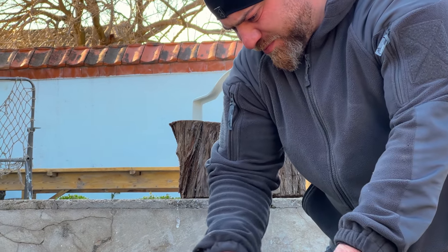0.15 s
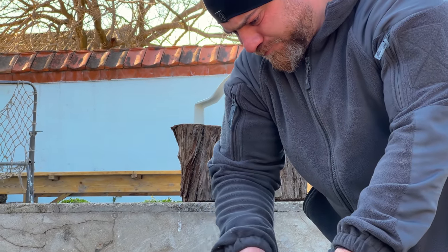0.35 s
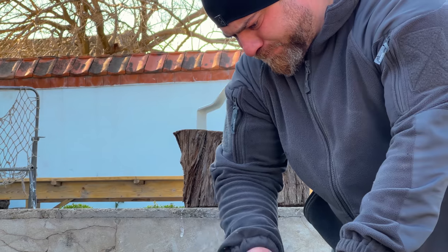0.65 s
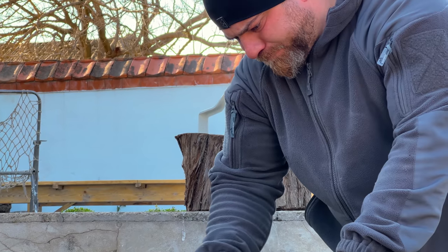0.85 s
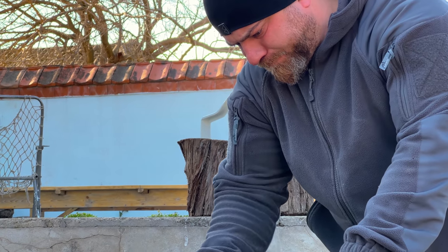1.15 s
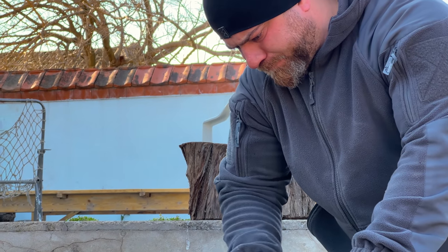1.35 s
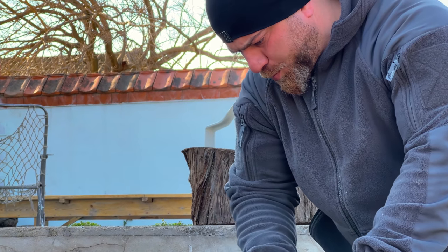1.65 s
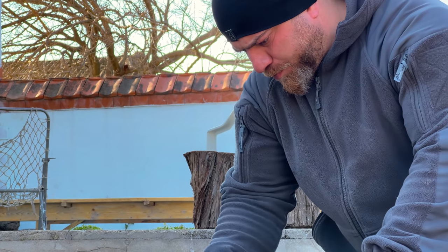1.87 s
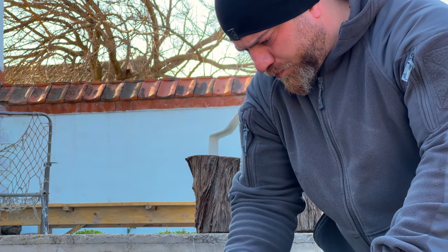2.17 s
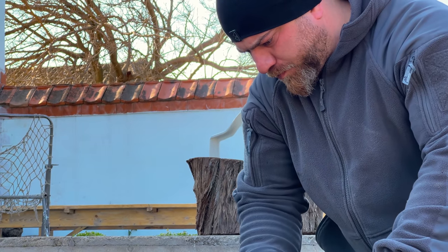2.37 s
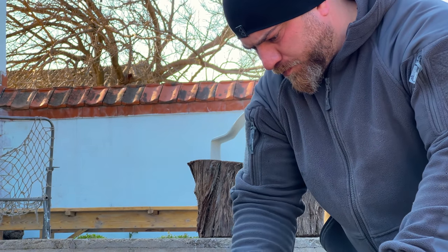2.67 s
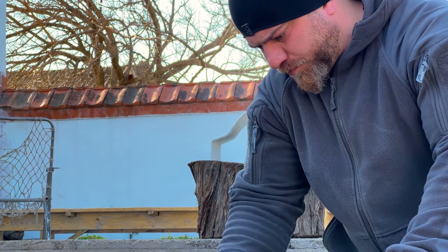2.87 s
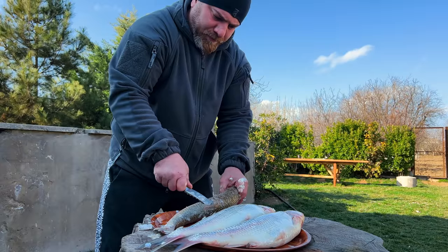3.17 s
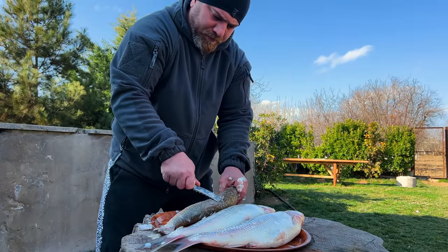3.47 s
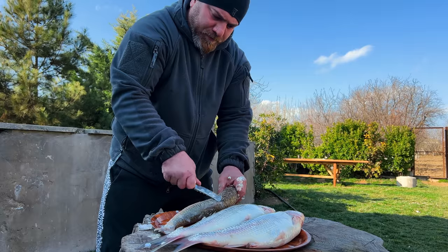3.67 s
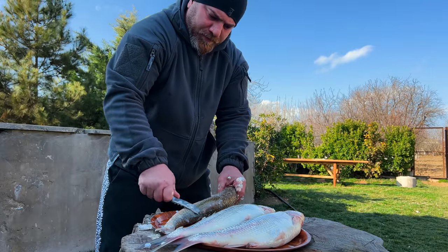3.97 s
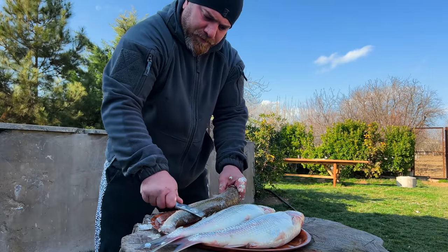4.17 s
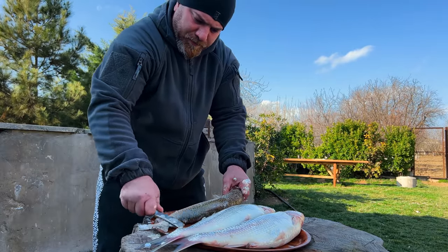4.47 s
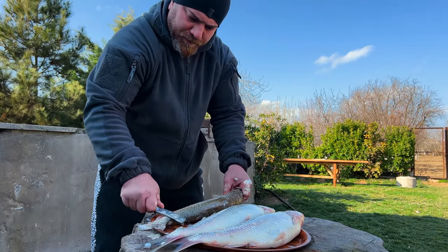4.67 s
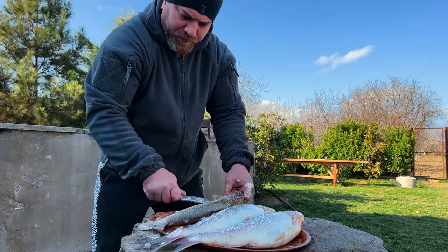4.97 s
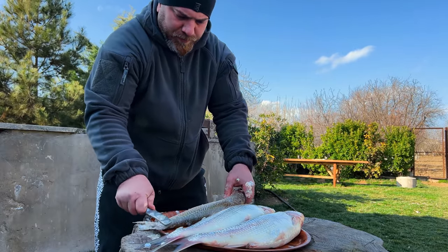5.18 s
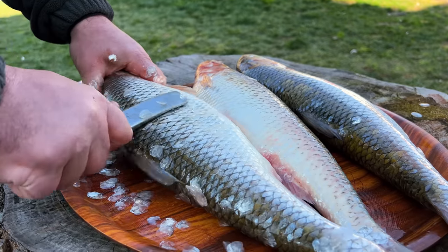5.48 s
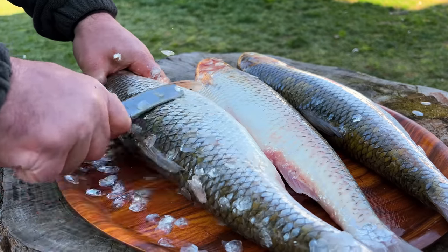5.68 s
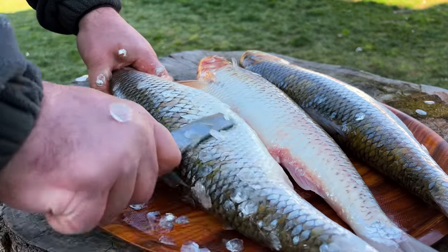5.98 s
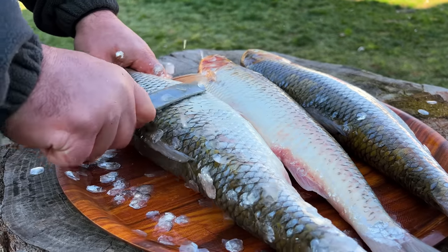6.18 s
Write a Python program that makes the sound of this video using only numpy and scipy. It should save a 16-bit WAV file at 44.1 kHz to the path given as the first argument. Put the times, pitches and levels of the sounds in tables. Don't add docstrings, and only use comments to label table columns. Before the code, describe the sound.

Crisp, rhythmic fish scaling with a metal blade over a wooden tray in a quiet garden, suddenly louder and closer near the end.

```python
import sys
import numpy as np
from scipy import signal
from scipy.fft import rfft, irfft
from scipy.io import wavfile
from scipy.ndimage import uniform_filter1d

SR = 44100
rng = np.random.default_rng(int(sys.argv[2]) if len(sys.argv) > 2 else 0)


def invert_db(x):
    u = np.asarray(x, float) / 20
    return 10 ** u


def master(y):
    cut = np.clip(np.atleast_2d(y).T, -1, 1)
    pcm = np.round(cut * 32767)
    wavfile.write(sys.argv[1], SR, pcm.astype(np.int16))


N = 279153
T, HZ = np.arange(N) / SR, np.arange(N // 2 + 1) * SR / N


def over_hz(rows, axis=1):
    rows = np.array(rows, float)
    return np.interp(np.log(HZ + 1), np.log(rows[:, 0]), rows[:, axis])


def over_time(gestures):
    power = np.zeros(N)
    for corners in gestures:
        s, db = np.transpose(corners)
        s = np.r_[s[0] - 0.006, s, s[-1] + 0.012]
        db = np.r_[db[0] - 18, db, db[-1] - 18]
        span = slice(max(int(s[0] * SR), 0), int(s[-1] * SR))
        power[span] += invert_db(np.interp(T[span], s, db)) ** 2
    return np.sqrt(power)


def unit(x):
    return x / np.sqrt(np.mean(x ** 2))


def walk(rate):
    k = int(SR / rate)
    steps = np.repeat(rng.standard_normal(N // k + 1), k)
    return 0.76 * uniform_filter1d(uniform_filter1d(steps, k), k)[:N]


def spikes(s, size):
    x = np.zeros(N)
    np.add.at(x, np.clip((np.asarray(s) * SR).astype(int), 0, N - 1), size)
    return x


def smear(x, decay_s):
    tail = np.exp(-T[:400] / decay_s)
    power = signal.fftconvolve(x ** 2, tail / tail.sum())[:N]
    return np.sqrt(abs(power)) * rng.standard_normal((2, N))


def patches(x, depth_db, rate):
    _, _, z = signal.stft(x, nperseg=256)
    field = rng.standard_normal((20, z.shape[-1]))
    field = unit(uniform_filter1d(field, size=int(SR / 128 / rate)))
    half_octave = (2 * np.log2(np.arange(z.shape[-2]) + 1)).astype(int)
    _, y = signal.istft(z * invert_db(depth_db * field[half_octave]), nperseg=256)
    return unit(y[..., :N])


def pair_noise(colour, apart, x):
    mid, side = rfft(x) * invert_db(over_hz(colour))
    scale = np.sqrt(np.mean(irfft(mid, N) ** 2))
    return irfft(mid + apart * side * np.array([[1], [-1]]), N) / scale


# f/Hz, level/dB per Hz
GARDEN_COLOUR = [(35, 1), (72, 12.5), (110, -37), (220, 3), (600, -7), (1500, -14.5), (4000, -18.5),
                 (8800, -24.5), (10100, -48), (11300, -20.5), (13000, -19), (16000, -35)]


def garden():
    drift = invert_db(1.1 * walk(2.65) + 2.6 * walk(5.39))
    air = patches(rng.standard_normal((2, N)), depth_db=3.5, rate=9.8) * drift
    shelter = invert_db(np.interp(T, [2.35, 2.5, 2.65, 2.8, 4.9, 5.05], [2.5, 0.5, 0.0, -2, 2.0, 7]))
    return invert_db(-76) * shelter * pair_noise(GARDEN_COLOUR, 0.95, air)


# middle t/s, half length/s, level/dB
GUSTS = [(0.115, 0.13, -51), (0.526, 0.031, -67), (0.814, 0.041, -66.5), (1.466, 0.042, -59),
         (1.577, 0.12, -58), (1.824, 0.032, -61), (1.997, .1, -67), (2.146, 0.032, -50.5),
         (2.246, 0.046, -53), (2.537, 0.057, -62.5), (2.684, 0.045, -72), (3.088, 0.55, -66.5),
         (3.46, 0.032, -72), (4.003, 0.25, -73), (4.54, 0.087, -64), (5.15, 0.044, -55.5),
         (5.247, 0.093, -53), (5.36, 0.022, -69), (5.494, 0.067, -52.5), (5.61, 0.095, -51),
         (5.817, 0.081, -49.5), (5.986, 0.057, -56), (6.117, 0.051, -45.5), (6.26, 0.069, -55.5)]
# t/s, peak level/dB
BUMPS = [(0.225, -49), (1.414, -52.5), (1.528, -49), (1.809, -58), (2.135, -47), (2.233, -45), (2.337, -54),
         (2.53, -53), (4.921, -77), (5.103, -71), (5.254, -42), (5.345, -51), (5.603, -47), (5.78, -42),
         (6.11, -49), (6.242, -47.5)]
# f/Hz, level/dB
WIND_COLOUR = [(30, -2), (75, 3), (100, 8), (125, 3.5), (200, -5), (400, -18), (700, -48), (1200, -50)]


def wind():
    calm_db, fall_db = -75.5, 11.5
    gust = invert_db(calm_db) + sum(invert_db(db - fall_db * abs(T - s) / half) for s, half, db in GUSTS)
    eddies = rng.standard_normal((2, N)) * invert_db(3.8 * walk(30))
    rumble = invert_db(-1.0) * gust * pair_noise(WIND_COLOUR, 0.5, eddies)
    t = T[:4000]
    glide = 0.59 * (1 - np.exp(-t / 0.006))
    ring = np.sin(2 * np.pi * (112 * t + glide)) * np.exp(-t / 0.015)
    s, db = np.transpose(BUMPS)
    bumps = signal.fftconvolve(spikes(s, invert_db(db)), ring)[:N]
    return rumble + bumps * invert_db([[0.6], [-0.6]])


def tone(call, orders, waver):
    s, length, from_hz, to_hz, db = call
    if to_hz > from_hz:
        ease, loudest, swell_db, fade_db = 1.6, 0.85, 6, 3
    else:
        ease, loudest, swell_db, fade_db = 4.5, 0.45, 9, 11
    done = (1 - np.exp(-ease * np.clip((T - s) / length, 0, 1))) / (1 - np.exp(-ease))
    phase = 2 * np.pi * np.cumsum((from_hz + (to_hz - from_hz) * done) * waver) / SR
    wave = sum(invert_db(order_db) * np.sin(k * phase) for k, order_db in orders)
    if abs(to_hz - from_hz) < 50:
        wave = wave * invert_db(-11 * np.sin(np.pi * 29 * (T - s)) ** 2)
    swell = [(s, db - swell_db), (s + loudest * length, db), (s + length, db - fade_db)]
    return np.sqrt(2) * wave * over_time([swell])


# t/s, length/s, from f/Hz, to f/Hz, peak level/dB
BIRDS = [(.75, .2, 2480, 3250, -82), (.79, .075, 6080, 6220, -79), (.872, .02, 6000, 5940, -81),
         (.9, .045, 6600, 6780, -72), (1.065, .09, 3800, 3170, -69), (1.15, .11, 3200, 3175, -76),
         (1.195, .05, 6650, 6800, -74), (1.34, .08, 3300, 3240, -80), (1.435, .06, 4010, 3985, -73),
         (1.493, .125, 3980, 3995, -67), (1.62, .06, 3970, 3950, -78), (1.96, .03, 3950, 4200, -82),
         (2.05, .2, 3730, 3710, -76), (3.68, .25, 2330, 3430, -77), (3.93, .016, 3400, 3230, -79),
         (3.955, .04, 3410, 3380, -84), (4.12, .045, 3450, 3150, -87), (4.43, .09, 5450, 5230, -84)]
# t/s, length/s, from f/Hz, to f/Hz, peak level/dB
FOWL = (2.17, .11, 405, 407, -79)
# multiple of the pitch, level/dB
FOWL_ORDERS = [(2, 7), (3, 3), (4, -5), (5, -7)]


def birds():
    waver = 1 + 0.005 * walk(120)
    song = sum(tone(call, [(1, 0)], waver) for call in BIRDS)
    song = song * invert_db(2.5 * walk(60) - 1.5)
    fowl = tone(FOWL, FOWL_ORDERS, waver) * invert_db(1.9 * walk(63))
    return np.array([song, np.roll(song, 1)]) + fowl


def ticks(rows, ring_s, crack, rise_s, rough):
    out, t = np.zeros(N), T[:4000]
    shape = np.exp(-t / ring_s) * (1 - np.exp(-t / rise_s))
    for s, db, hz in rows:
        dry_crack = crack * uniform_filter1d(rng.standard_normal(4000), size=6)
        wobble = rough * np.cumsum(rng.standard_normal(4000)) / 10
        ring = np.sin(2 * np.pi * hz * t + wobble)
        out[int(s * SR):int(s * SR) + 4000] += invert_db(db) * (ring + dry_crack) * shape
    return out


# t/s, peak level/dB, f/Hz
DROPS = [(1.32, -47, 950), (1.3275, -53, 833), (1.338, -43.5, 976), (1.355, -47, 1000), (5.06, -53, 1680),
         (5.093, -55, 1590), (5.105, -48, 1760), (5.121, -50, 1540), (5.135, -63, 1720), (5.146, -47, 1875),
         (2.027, -61.5, 1330), (2.067, -57.5, 1450), (2.2948, -52, 1145), (2.3194, -51.5, 1540),
         (2.378, -55, 1660), (2.4107, -58.5, 1295)]
# t/s, peak level/dB, f/Hz
KNOCKS = [(2.3, -60, 519), (2.416, -58.5, 427), (2.875, -64, 564), (2.734, -54, 436), (3.039, -59.5, 407),
          (4.178, -58.5, 419), (4.205, -55, 365.5), (4.246, -64, 352), (4.55, -53, 418),
          (4.885, -56.5, 415), (4.92, -56, 340), (5.165, -52, 414)]


def wood():
    scales = ticks(DROPS, ring_s=0.0056, crack=1.26, rise_s=0.0002, rough=2.2)
    return scales + ticks(KNOCKS, ring_s=0.031, crack=0.58, rise_s=0.0051, rough=0.71)


# f/Hz, width/Hz, level/dB
TRAY = [(740, 70, 6), (1000, 80, 8)]


def tray_ring():
    return 1 + sum(invert_db(db) / (1 + 2j * (HZ - hz) / width) for hz, width, db in TRAY)


# f/Hz, level/dB
BESIDE = [(370, -11.5), (990, -8.5), (2450, -10.5), (4200, 7.5), (5400, 3), (6500, 8.5), (7900, 1.5),
          (9200, 3.5), (10300, -7.5), (12000, 4.5), (15500, 1)]
FRONT = [(394, -4.5), (860, -10), (2800, -11.5), (4800, 4), (5600, 6.5), (7200, 2), (8500, 10), (10000, 5),
         (11870, 7), (16000, 12)]
CLOSE = [(484, -6), (1380, -10), (2500, -7), (3500, 8), (4800, 11), (6200, 8.5), (7800, 4), (8420, 11.5),
         (10090, 6.5), (11940, 12), (15800, 13)]
# from t/s, colour; from the second entry on a hand damps the tray
PLACES = [
    (0.0, BESIDE),
    (1.9, BESIDE),
    (3.1, FRONT),
    (5.009, CLOSE),
]
# f/Hz, left lead/rad, likeness 0-1; the phone's case alone sets the top range
CASE = [(9600, -3.05, .8), (10200, -3.15, .93), (12000, -5, .94), (14000, -6.65, .94), (15500, -8.2, .87)]
BESIDE_PORTS = [(400, 0, .8), (1500, 0, .97), (3000, .25, .93), (4000, .55, .85), (5400, .1, .9),
                (6000, -.5, .85), (6700, 0, .93), (7800, -.6, .85)]
FRONT_PORTS = [(400, .2, .7), (900, 2, .2), (2000, .7, .6), (3800, 2.9, .75), (4800, 1.8, .4),
               (6000, 2.2, .15), (7000, .8, .4), (8400, -3.2, .25)]
CLOSE_PORTS = [(400, .4, .5), (1500, .6, .65), (3500, 2.85, .92), (4500, 3.14, .75), (5400, 3.2, .45),
               (6000, 2, .15), (7200, 0, .2), (8400, -1.9, .65)]


def phone_paths():
    paths = []
    pairs = [BESIDE_PORTS, BESIDE_PORTS, FRONT_PORTS, CLOSE_PORTS]
    for (_, place), pair in zip(PLACES, pairs):
        like = over_hz(pair + CASE, axis=2)
        lead = np.exp(0.5j * over_hz(pair + CASE) * np.array([[1], [-1]]))
        colour = invert_db(over_hz(place))
        paths.append((colour * np.sqrt(like) * lead, colour * np.sqrt(1 - like)))
    paths[0] = [path * tray_ring() for path in paths[0]]
    return paths


def strokes(rows, rise_db, hold, sag_db, lift_db, bite_at, before_db, after_db, answer, skim_db):
    edge = over_time([[(s, db - rise_db),
                       (s + at * length, db),
                       (s + (at + hold * (1 - at)) * length, db - sag_db),
                       (s + length, db - lift_db)] for s, length, db, at, _ in rows])
    gains = [edge]
    for (per_db, over_db), skim in zip(answer, skim_db):
        bites = []
        for s, length, db, _, deep in rows:
            top = db + per_db * deep + over_db
            bites.append([(s, top - before_db), (s + bite_at * length, top), (s + length, top - after_db)])
        gains.append(np.hypot(invert_db(skim) * edge, over_time(bites)))
    return np.array(gains)


# t/s, length/s, edge peak level/dB, peak place as share of length, bite/dB
STROKES = [(0.05, 0.099, -49, 0.41, -3), (0.34, 0.12, -49.5, 0.44, -2), (0.64, 0.092, -47, 0.5, 1),
           (0.92, 0.13, -50, 0.47, 3), (1.25, .13, -49, 0.53, 1), (1.595, 0.21, -55.5, 0.047, -31),
           (1.64, 0.11, -50.5, 0.47, 4.5), (1.98, 0.086, -51.5, 0.58, -13), (2.33, 0.1, -50, 0.43, -13),
           (2.655, 0.098, -51, 0.71, -6), (2.965, 0.11, -50, 0.4, -9), (3.2, 0.082, -48, 0.51, -23.5),
           (3.352, 0.059, -58, .2, -36), (3.42, 0.093, -45, 0.36, -28), (3.553, 0.062, -54.5, 0.6, -35),
           (3.76, 0.092, -61.5, 0.077, -33), (3.63, 0.079, -45, 0.45, -27.5),
           (3.84, 0.098, -51.5, 0.39, -23), (4.16, 0.15, -52.5, 0.24, -16), (4.52, 0.09, -49.5, 0.74, -10),
           (4.83, 0.11, -54, 0.82, -10)]
CLOSE_STROKES = [(5.03, 0.15, -43, 0.4, -4.5), (5.325, 0.047, -42, 0.2, -56), (5.385, 0.13, -32, 0.042, -6),
                 (5.535, 0.08, -35.5, 0.23, -14), (5.632, 0.11, -33, 0.11, -5.5),
                 (5.765, 0.098, -33.5, 0.22, -19), (5.872, .12, -31.5, .08, -5),
                 (6.012, 0.096, -36, 0.17, -10.5), (6.125, 0.14, -30.5, 0.12, -5.5),
                 (6.275, 0.07, -45.5, 0.26, -3.5)]
# the edge rises, sags while the blade holds, then lifts; late on the blade bites, and
# scales and flesh answer by (dB per dB of bite, dB over edge peak); until then they skim along under the edge
FAR_STROKE = dict(rise_db=17.5, hold=0.37, sag_db=12.5, lift_db=23, bite_at=0.67, before_db=32, after_db=17.5, answer=[(.4, -8.5),
              (1.01, -4.6)], skim_db=[-14, -33])
CLOSE_STROKE = dict(rise_db=21.5, hold=0.85, sag_db=9.5, lift_db=36, bite_at=0.63, before_db=11.5, after_db=17.5, answer=[(1.55, -2),
                (0.14, -20.5)], skim_db=[-17, -25])


def blade_work():
    return np.hypot(strokes(STROKES, **FAR_STROKE), strokes(CLOSE_STROKES, **CLOSE_STROKE))


# middle t/s, half length/s, edge level/dB
RETURNS = [(0.21, 0.065, -60), (0.5, 0.073, -58.5), (0.613, 0.044, -60), (0.787, 0.071, -59.5),
           (1.089, 0.037, -52.5), (1.172, 0.068, -72.5), (1.428, 0.013, -52), (1.463, 0.035, -56),
           (1.529, 0.021, -59), (1.79, 0.021, -66), (1.82, 0.022, -62.5), (1.917, 0.11, -67.5),
           (2.08, 0.03, -62.5), (2.181, 0.013, -71), (2.247, 0.02, -58.5), (2.785, 0.041, -59),
           (2.867, 0.035, -60.5), (3.082, 0.042, -59.5), (3.289, 0.031, -69), (3.984, 0.028, -83),
           (4.064, 0.076, -58.5), (4.316, 0.02, -58), (4.373, 0.027, -66), (4.402, 0.052, -64.5),
           (4.656, 0.0093, -84), (4.74, 0.11, -66.5), (4.95, 0.045, -61.5), (5.211, 0.017, -54)]


def return_glides():
    return over_time([[(s - half, db - 18.5), (s, db), (s + half, db - 9.5)] for s, half, db in RETURNS])


def slips(rate, spread_db, hiss, rows_db):
    size = invert_db(spread_db * np.minimum(rng.exponential(size=N), 3.0))
    kick = (rng.random(N) < rate / SR) * size
    grit = unit(smear(kick, 0.00013)[0]) + hiss * rng.standard_normal(N)
    return unit(grit * invert_db(rows_db * walk(150)))


def echoed(gain, wall_db, decay_s):
    tail = np.exp(-T[:12000] / decay_s)
    echo = signal.fftconvolve(gain ** 2, invert_db(wall_db) ** 2 * tail / tail.sum())[:N]
    return np.sqrt(gain ** 2 + abs(echo))


# t/s, peak level/dB, rattle/dB over peak
SNAPS = [(0.0885, -39, 3.5), (0.0962, -32, -12), (0.115, -38, -6), (0.1729, -46, -20), (0.3276, -36, -27),
         (0.351, -36, -15), (0.3777, -29.5, -14), (0.3857, -32, -9), (0.3903, -34.5, -17),
         (0.401, -36, -19), (0.4104, -46, 1), (0.418, -36, -7), (0.4287, -36.5, 2.5), (0.5392, -57, -20),
         (0.6204, -47, -12), (0.6626, -30.5, -16), (0.6694, -31, -17), (0.6742, -24, -12),
         (0.6824, -35, -20), (0.6904, -37, 4), (0.695, -31.5, -3), (0.703, -41, -13), (0.7063, -30, -9),
         (0.7858, -36, -18), (0.9538, -29, -8), (0.973, -40, -9), (0.9897, -44, 10), (1, -40, 3),
         (1.008, -34, -10), (1.0989, -46, -15), (1.2867, -39.5, 2.5), (1.3006, -36, -12), (1.3197, -38, -3),
         (1.3263, -35, 7.5), (1.3387, -38, 4), (1.4136, -38, 10), (1.517, -37, -9), (1.526, -34, -25),
         (1.6052, -27, -29), (1.6155, -27, -31), (1.6229, -41, -21), (1.6282, -37, -17), (1.6336, -36, -29),
         (1.6455, -31, -18), (1.663, -31, -12), (1.6717, -24, -24), (1.679, -39, -15), (1.6957, -42, -2),
         (1.7043, -31.5, 4.5), (1.7181, -29, 0), (1.7328, -37, -9), (1.7875, -57, 15), (1.8238, -31.5, -31),
         (1.845, -44, -27),
         (2.0121, -40, -25), (2.0248, -32, -20), (2.0348, -36, -8), (2.1786, -54, -4),
               (2.3685, -37.5, 1), (2.3754, -29, -18), (2.3785, -42, -2.5), (2.3947, -35, -23),
               (2.4445, -43, -12), (2.6878, -41, -7), (2.7142, -38, -5), (2.7197, -43, -10),
               (2.9748, -39, -13), (2.9871, -36, -14), (3.0273, -36, -9), (3.0314, -51, -1),
               (3.036, -40, 7), (3.0412, -37, -12), (3.0594, -49.5, 8.5), (3.0813, -42, -16),
               (3.2086, -53, -15), (3.2328, -30.5, -13), (3.2431, -31, -23), (3.2464, -34, -11),
               (3.2847, -49, -14), (3.2938, -39, -12), (3.4043, -42, -27), (3.4309, -32, -26),
               (3.4458, -25.5, -15), (3.4552, -36, -15), (3.4603, -40, -15), (3.64, -49, -19),
               (3.6526, -40, -21), (3.6563, -29, -6.5), (3.6604, -43, -20), (3.6656, -37, -3),
               (3.674, -46, 0), (3.8419, -36, -27), (3.8608, -25.5, -22), (3.8701, -36, -8),
               (4.0426, -43, -20), (4.0633, -42, -7), (4.1801, -32, -16), (4.1843, -48, -19),
               (4.2136, -31.5, -14), (4.2544, -38, -24), (4.2716, -40, -19), (4.3814, -29.5, -26),
               (4.4335, -44, -15), (4.5141, -44, -12), (4.5676, -29, -12), (4.5782, -24, -26),
               (4.6038, -38, -14), (4.869, -48, -22), (4.8802, -26.5, -17), (4.8862, -35, -11),
               (4.897, -29.5, -11), (4.9164, -20.5, -27)]
CLOSE_SNAPS = [(5.0391, -22, -10), (5.0762, -14, -15.5), (5.0862, -27.5, -6.5), (5.0914, -27, -12),
               (5.1049, -17, -4), (5.133, -15, -9), (5.1421, -31, 8.5), (5.1458, -17, -5.5),
               (5.39, -19, -25), (5.4014, -6.5, -8), (5.4087, -13.5, -4), (5.418, -14.5, -9),
               (5.4316, -12.5, -9), (5.4356, -20, -5), (5.4484, -12, -10), (5.4624, -11, -11),
               (5.471, -23, -15), (5.477, -19, -16), (5.4836, -16, -3.5), (5.4883, -18, -14),
               (5.4913, -25, 2), (5.533, -30, -20), (5.579, -22, -20), (5.638, -12, -23),
               (5.6444, -9.5, -22), (5.6484, -14, -5.5), (5.666, -19.5, 1.5), (5.6718, -22.5, 6),
               (5.677, -22, -13), (5.6969, -26, -3), (5.7144, -10.5, -14), (5.7334, -11, -14.5),
               (5.766, -32, -20), (5.781, -28, -12), (5.7923, -23, -25), (5.8845, -21, -7),
               (5.8942, -20, -7), (5.8992, -20, -1.5), (5.904, -15.5, -7), (5.9268, -12, -15),
               (5.9331, -18, -10), (5.937, -25, -7), (5.9541, -19, -10), (5.9675, -42, 4),
               (5.9735, -26.5, 2.5), (5.984, -39, 1), (6.0289, -9.5, -22), (6.0489, -12, -29),
               (6.1298, -18, -25), (6.1474, -14.5, -6.5), (6.1504, -14, -7.5), (6.157, -18, -4),
               (6.1637, -19, -4), (6.1766, -20, 0), (6.216, -23, 5.5), (6.2234, -23, -4),
               (6.2475, -23.5, 1.5), (6.2505, -12.5, -19), (6.2805, -22.5, -16), (6.2984, -16.5, -26)]


def scale_snap(k):
    s, peak_db, rattle_db = np.transpose(SNAPS + CLOSE_SNAPS)
    level_db = [peak_db, peak_db + rattle_db, peak_db + rattle_db - 11][k]
    kick = spikes(s + 0.0014, invert_db(level_db))
    rattle = smear(kick, 0.00041 * (1 + 1.04 * k))[0]
    return (0.85 - 0.27 * k) * kick + (0.33 + 0.15 * k) * rattle


# low edge f/Hz, high edge f/Hz, from f/Hz, to f/Hz
LAYERS = [
    (10400, 15900, 11000, 16000),
    (2600, 10400, 3000, 9000),
    (300, 2600, 400, 2500),
]


def knife():
    work, glides, paths = blade_work(), return_glides(), phone_paths()
    shared = slips(rate=900, spread_db=3.0, hiss=0.64, rows_db=1.95)
    edges = [s for s, _ in PLACES] + [N / SR]
    out = 0
    for k, (back_db, own) in enumerate([(-2.0, 0.14), (-13.5, 0.85), (-21.5, 0.5)]):
        gain = np.hypot(work[k], invert_db(back_db) * glides)
        own_slips = own * slips(rate=320, spread_db=3.0 - 0.48 * k, hiss=0.31, rows_db=0.5)
        texture = patches(shared + own_slips, depth_db=0.93 + 1.35 * k, rate=45)
        hail = echoed(gain, wall_db=-14, decay_s=0.026) * texture
        both = hail + 1.86 * scale_snap(k)
        blurred = smear(both, 0.0012)
        lo, hi, a, b = LAYERS[k]
        band = 1 / np.sqrt(1 + (lo / (HZ + 1)) ** 16) / np.sqrt(1 + (HZ / hi) ** 16)
        counted = band * (HZ > a) * (HZ < b)
        for (direct, scatter), start, end in zip(paths, edges, edges[1:]):
            direct_power = abs(counted * direct.mean(axis=0)) ** 2
            rms = np.sqrt(np.mean(direct_power + abs(counted * scatter) ** 2 / 2))
            here = (T >= start) * (T < end) / rms
            out = out + band * (direct * rfft(here * both) + scatter * rfft(here * blurred))
    return irfft(out, N)


def scene():
    return garden() + wind() + birds() + wood() + knife()


def roll_off(x):
    return signal.sosfilt(signal.butter(12, 17010, fs=SR, output="sos"), x)


def record(dry):
    top = 0.012 * (HZ < 16700) + 1 / (1 + np.exp(np.clip((HZ - 15880) / 45, -50, 50)))
    low_cut = 0.05 + 1 / np.sqrt(1 + (99 / (HZ + 1)) ** 24)
    mix = irfft(rfft(dry) * top * low_cut, N)
    return roll_off(mix)


dry = scene()
out = record(dry)
master(out)
```